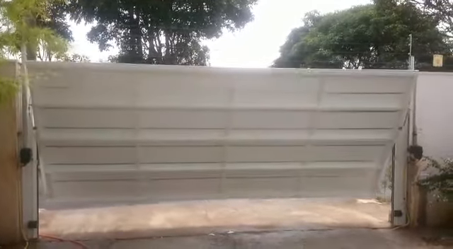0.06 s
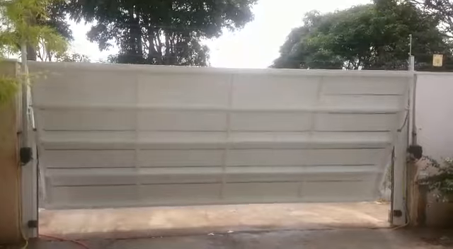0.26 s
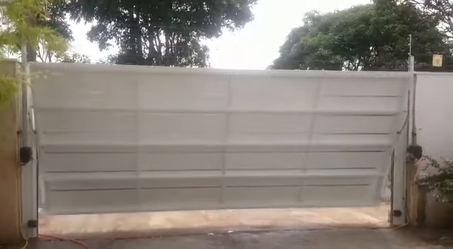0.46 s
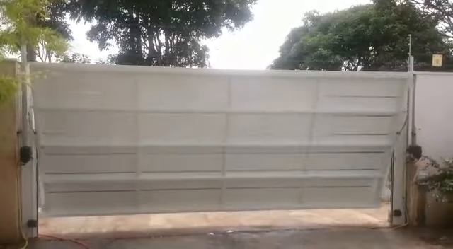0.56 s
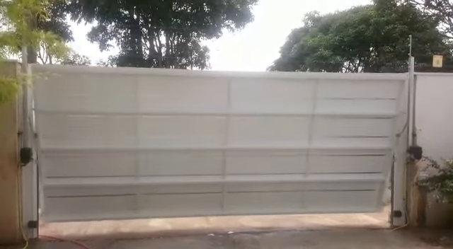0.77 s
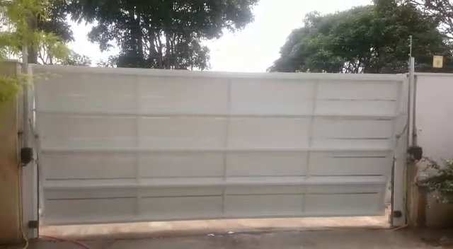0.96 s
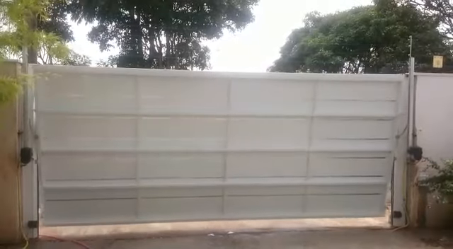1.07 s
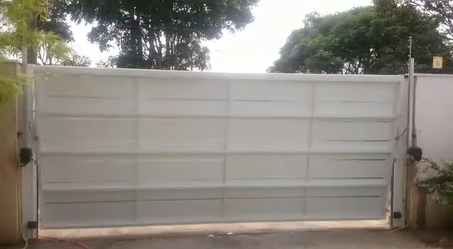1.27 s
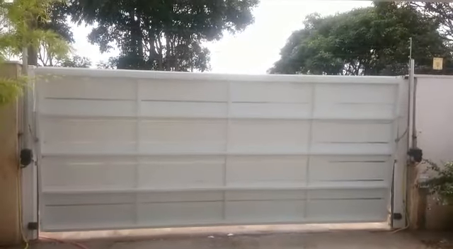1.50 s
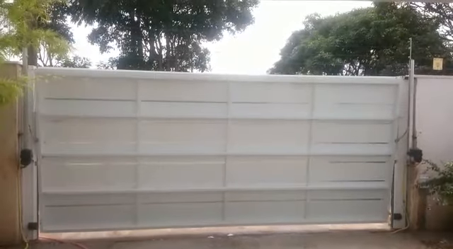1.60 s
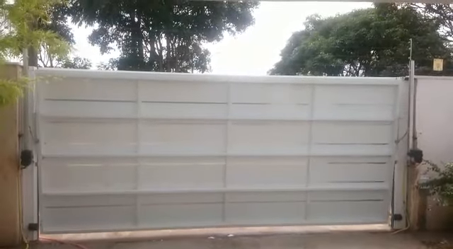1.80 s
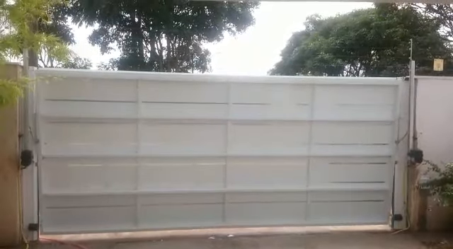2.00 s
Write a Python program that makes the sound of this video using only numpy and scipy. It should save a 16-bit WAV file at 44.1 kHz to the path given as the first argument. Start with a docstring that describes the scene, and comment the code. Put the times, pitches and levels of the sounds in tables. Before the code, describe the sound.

A metal garage gate shuts in an outdoor driveway: the drive whirs and squeaks faintly, the panel clunks and rumbles, and the motor winds down with a slowing, pulsing rasp over faint hum. The microphone is duller on the left.

```python
"""A tilting garage gate shuts

The drive whirs and rubbing metal squeals thinly, then the drive lets go with a clunk that excites the
modes of the sheet-metal panel. The motor coasts down, rubbing once a turn and ringing its housing,
over a faint mains hum. The left microphone port is muffled and hears everything slightly later."""
import sys
import numpy as np
from scipy import signal
from scipy.fft import rfft, irfft
from scipy.io import wavfile
from scipy.ndimage import map_coordinates

SR = 44100
rng = np.random.default_rng(int(sys.argv[2]) if len(sys.argv) > 2 else 0)


def digitize_waveform(pressure):
    """Quantize a signal to 16-bit integers and store it at the path in sys.argv[1].

    Rows of a 2-D input are taken as channels; values are limited to [-1, 1].
    """
    field = np.atleast_2d(pressure).T
    bounded = np.clip(field, -1, 1)
    quanta = np.round(bounded * 32767).astype(np.int16)
    wavfile.write(sys.argv[1], SR, quanta)


N = 90404
T = np.arange(N) / SR

def undb(db):
    """Decibels to amplitude ratio."""
    return 10 ** (np.asarray(db) / 20)

def unit(x):
    """Normalisation to rms 1."""
    return x / np.sqrt(np.mean(x ** 2))

def curve(rows):
    """Linear interpolation of (seconds, value) rows."""
    return np.interp(T, *np.array(rows).T)

def colour(x, points):
    """Spectral shaping by (Hz, dB) points."""
    hz, db = np.array(points).T
    freqs = np.fft.rfftfreq(2 * N, 1 / SR)
    gain = undb(np.interp(np.log(freqs + 1), np.log(hz), db))
    return irfft(rfft(x, 2 * N) * gain)[:N]

def noise(points):
    """Spectrally shaped noise of rms 1."""
    return unit(colour(rng.standard_normal(N), points))

def octave(hz):
    """Octave-band noise of rms 1."""
    sos = signal.butter(3, [hz / np.sqrt(2), hz * np.sqrt(2)], "band", fs=SR, output="sos")
    return unit(signal.sosfilt(sos, rng.standard_normal(N)))

def wander(position):
    """Smooth random modulation, one new value per unit of position."""
    return map_coordinates(rng.standard_normal(N), [position], order=3, mode="wrap")

def swell(middle, length):
    """A raised-cosine envelope, 1 at its middle."""
    return np.cos(np.pi * np.clip((T - middle) / length, -.5, .5)) ** 2

# Hum partials. Each row: frequency in Hz, level in dB.
HUM_PARTIALS = [(64.6, -70), (122, -60), (360, -66.5), (479, -72), (598, -56)]
# Easing of the hum. Each row: time in seconds, gain in dB.
HUM_GAIN = [(.9, 2), (1.3, 0)]
# Outdoor air. Each row: frequency in Hz, relative density in dB.
AIR_SPECTRUM = [(25, 23), (60, 19), (130, -5), (300, -5), (600, -10), (1200, -5), (3000, -13), (10000, -28)]
def background():
    """Superposition of a faint electric hum and the broadband noise of outdoor air."""
    hum = sum(undb(db + wander(T * 5)) * np.sin(2 * np.pi * hz * T) for hz, db in HUM_PARTIALS)
    return undb(curve(HUM_GAIN)) * hum + undb(-61.5) * noise(AIR_SPECTRUM)

# Panel rumble. Each row: frequency in Hz, relative density in dB.
RUMBLE_SPECTRUM = [(30, -32), (55, 5), (90, 1), (130, -1.5), (190, -7), (260, -8), (500, -28.5)]
# Its envelope. Each row: time in seconds, level in dB.
RUMBLE_ENVELOPE = [(0, -67), (.4, -35), (.7, -44), (1.0, -49.5), (1.35, -51), (1.5, -57.5), (2.05, -65)]
def rumble():
    """Random low-frequency vibration of the panel fades as it comes to rest."""
    return noise(RUMBLE_SPECTRUM) * undb(curve(RUMBLE_ENVELOPE))

# Low swells. Each row: middle in seconds, length in seconds, frequency in Hz, level in dB.
PANEL_SWELLS = [(.34, .11, 64, -33), (.335, .11, 158, -35), (.46, .19, 77, -34), (.51, .16, 56, -35),
                (.5, .19, 120, -36), (.755, .09, 67, -42), (.88, .1, 53, -37), (1.0, .18, 195, -46),
                (1.19, .14, 57, -47)]
def wobbles():
    """Flexural vibration: the loose panel radiates low tone bursts as it wobbles."""
    return sum(undb(db) * swell(middle, length) * np.sin(2 * np.pi * hz * (T - middle))
               for middle, length, hz, db in PANEL_SWELLS)

# Squeals. Each row: start and end in seconds, frequency in Hz, glide in Hz per second, relative dB.
SQUEAL_TONES = [(-.05, .38, 9470, 250, -13), (-.05, .26, 10340, 0, -10), (-.05, .16, 10060, 0, -7),
                (.14, .26, 10065, 0, 1), (.24, .38, 10075, 0, -4), (.37, .48, 10085, 0, 1),
                (.52, .72, 10085, 0, -1), (.08, .19, 10925, -500, -2), (.19, .33, 10870, -300, -7),
                (.295, .385, 10850, -400, 2), (.37, .55, 10810, -200, -5)]
def squeals():
    """Friction-induced oscillation: rubbing metal gives very high, rough, flickering tones."""
    out = 0
    for start, end, hz, glide, db in SQUEAL_TONES:
        pitch = hz + glide * (T - start) + 14 * wander(T * 60)
        fade = np.clip(np.minimum(T - start, end - T) / 0.033, 0, 1)
        roughness = .25 * wander(T * 400)
        angle = 2 * np.pi * np.cumsum(pitch) / SR + roughness
        flicker_db = 3 * wander(T * 35)
        out += undb(-47 + db + flicker_db) * fade * np.sin(angle)
    return out

# Housing modes. Each row: frequency in Hz, bandwidth in Hz, relative gain in dB.
HOUSING_MODES = [(1327, 65, 6), (2082, 186, -2), (2556, 270, -3.5), (2910, 65, 0), (4640, 150, -6.5),
                 (5510, 110, 2), (5870, 43, -3.5), (6000, 140, 7.5), (6350, 226, 3.5), (6200, 61, -1.5)]
def housing(x, ring=1):
    """Resonance: the motor's metal housing adds its ringing to the sound that excites it."""
    ringing = sum(undb(db) * signal.lfilter(*signal.iirpeak(hz, hz / width, fs=SR), x)
                  for hz, width, db in HOUSING_MODES)
    return x + ring * ringing

# Whir of the drive. Each row: frequency in Hz, relative density in dB.
WHIR_SPECTRUM = [(28, -35), (42, -4), (60, 7), (120, 0), (300, 1.5), (600, -3.5), (950, -4), (1330, -4),
                 (1700, -2), (2200, -6.5), (2900, -6.5), (3500, -9), (5000, -12.5), (6150, -11.5),
                 (7200, -16.5), (9000, -21.5), (12000, -23), (15500, -17)]
# Its envelope. Each row: time in seconds, level in dB.
WHIR_ENVELOPE = [(0, -37), (.17, -38.5), (.25, -35.5), (.65, -40), (1.0, -42.5), (1.35, -49.5),
                 (1.6, -54.5), (2.05, -60)]
def drive():
    """Forced vibration: gears and arms whir through the housing, fading as the gate settles."""
    return unit(housing(noise(WHIR_SPECTRUM))) * undb(curve(WHIR_ENVELOPE) + wander(T * 25))

# Late scrapes. Each row: middle in seconds, length in seconds, level in dB.
SCRAPE_SWELLS = [(1.5, .11, -46), (1.565, .045, -48), (1.678, .04, -48), (1.877, .08, -49),
                 (1.975, .08, -50)]
# Their friction noise. Each row: frequency in Hz, relative density in dB.
SCRAPE_SPECTRUM = [(1800, -39.5), (2300, -9), (2570, 2), (2900, -10), (3300, -29), (6000, -30), (9000, -45)]
def scrapes():
    """Sliding friction: in its last turns the rotor drags long enough to make the housing sing."""
    envelope = sum(undb(db) * swell(middle, length) for middle, length, db in SCRAPE_SWELLS)
    return unit(housing(noise(SCRAPE_SPECTRUM))) * envelope

# Close echoes. Each row: delay in seconds, gain in dB.
REFLECTIONS = [(.0043, -18.5), (0.0123, -12.5), (0.0221, -10), (0.0384, -21.5)]
def walls(x):
    """Early reflection: the wall and posts beside the motor return delayed copies."""
    return x + sum(undb(db) * np.pad(x, (int(delay * SR), 0))[:N] for delay, db in REFLECTIONS)

# Grinding bands. Each row: centre and width in multiples of the rotation rate, level in dB.
GRIND_BANDS = [(47.47, 7.5, -40), (79.9, 10, -44.5), (113.6, 13, -42.5), (137.8, 28, -43), (179, 36, -45),
               (255.5, 70, -46.5)]
# Their filter. Each row: frequency in Hz, gain in dB.
GRIND_FILTER = [(900, -33.5), (1700, -24), (2100, -11.5), (2650, -2.5), (3600, -4), (5000, -9), (8000, -4)]
def grinding(turns, pressure):
    """Rotational orders: rough bearing races make noise bands that sink with the speed."""
    bands = 0
    for multiple, width, db in GRIND_BANDS:
        angle = 2 * np.pi * multiple * turns
        band = wander(turns * width) * np.cos(angle) + wander(turns * width) * np.sin(angle)
        bands += undb(db) * unit(band)
    pulsing = 1 + 0.5 * (pressure - 1)  # half the grinding follows the rubs
    return housing(colour(bands * pulsing, GRIND_FILTER))

# Rubbing noise. Each row: frequency in Hz, relative density in dB.
RUB_SPECTRUM = [(900, -63), (1700, -14), (2100, -8), (2650, -5.5), (3400, -4.5), (5100, -4.5), (6150, -6),
                (7200, -5), (9200, -4.5), (10700, -3.5), (12300, -10), (15500, -5)]
# Coupling of the rub to the housing. Each row: time in seconds, gain in dB.
HOUSING_COUPLING = [(.25, 10.5), (.5, 4), (.78, 3.5), (1.05, 1), (1.3, 6.5), (1.55, 4), (1.8, 1.5),
                    (2.05, 2)]
def rubbing(pressure, slowness):
    """Amplitude modulation: friction noise follows the contact pressure and dulls at low speed."""
    grit = rng.standard_normal(N) * undb(.9 * wander(T * 3000))
    friction = colour(grit * pressure, RUB_SPECTRUM)
    rub = unit(housing(friction, ring=undb(curve(HOUSING_COUPLING))))
    fizz = signal.sosfiltfilt(signal.butter(2, 6630, "high", fs=SR, output="sos"), rub)
    return rub - fizz * slowness

# Rotor speed. Each row: time in seconds, turns per second.
ROTOR_SPEED = [(.25, 65.76), (.6, 52.85), (1.0, 38.42), (1.4, 23.91), (1.65, 14.98), (1.82, 9.18),
               (2.05, 11.0)]
# Contact left between rubs. Each row: time in seconds, share of full contact.
RESTING_CONTACT = [(.25, .32), (.75, .35), (1.05, .45), (1.35, .42), (1.7, .44)]
# Force of the rub. Each row: time in seconds, level in dB.
RUB_FORCE = [(.24, -64), (.33, -41.5), (.55, -37.5), (.75, -33.5), (1.05, -33.5), (1.35, -34), (1.6, -35),
             (1.8, -37.5), (2.05, -40.5)]
def motor(brisk_turns_per_s=31.2, rise_turns=.17, fall_turns=.13):
    """Periodic contact: the coasting rotor rubs once a turn, dragging longer in slow turns."""
    speed = curve(ROTOR_SPEED)
    turns = np.cumsum(speed) / SR
    phase = turns % 1
    slowness = np.maximum(1 - speed / brisk_turns_per_s, 0)
    drag = fall_turns * (1 + slowness)
    touch = np.where(phase < rise_turns, (phase / rise_turns) ** 2, np.exp(-(phase - rise_turns) / drag))
    touch = np.sin(np.pi / 2 * touch)  # the contact flattens at its peak
    rest = curve(RESTING_CONTACT)
    pressure = unit(rest + (1 - rest) * touch * undb(.4 * wander(turns)))
    force = undb(curve(RUB_FORCE))
    return walls(force * rubbing(pressure, slowness) + force / force.max() * grinding(turns, pressure))

# Metallic snap. Each row: frequency in Hz, relative density in dB.
SNAP_SPECTRUM = [(900, -20), (1600, 4), (2300, -2), (3000, -15), (3900, -9), (5000, -14), (6600, -7),
                 (8000, -44)]
def snap(start_s=.25, rise_s=.003, decay_s=.019):
    """An impact transient: a short, bright burst from the metal opens the clunk."""
    age = np.maximum(T - start_s, 0)
    envelope = np.minimum(age / rise_s, 1) * np.exp(-age / decay_s)
    return undb(-26.5) * envelope * noise(SNAP_SPECTRUM)

# The clunk and its rattles. Each row: start in seconds, ring gain, crack gain and knock level in dB.
IMPACTS = [(.248, 4, -2.5, -32), (0.269, -10.5, -2.5, -19.5), (.297, -10.5, -25, -18),
           (0.3089, -4.5, -2.5, -17), (0.333, -10, -3.5, -17), (0.403, -3.5, -20, -32)]
# Panel modes. Each row: frequency in Hz, relative level in dB, time to fall 60 dB in seconds.
PANEL_MODES = [(73.8, -49, 3), (118.1, -46, 1.5), (161.9, -40.5, 0.69), (198.5, -33, 0.44),
               (309, -26, 0.397), (337.5, -28, 0.43), (389.3, -29.5, 0.49), (409.2, -28, 0.37),
               (453.7, -31.5, 0.52), (484.5, -42.5, 1.16), (581, -37.5, 0.39), (630, -34.5, 0.4),
               (787, -44.5, 0.34), (1450, -43, 0.24), (1720, -41, 0.32)]
# Crack of a blow. Each row: frequency in Hz, relative density in dB.
CRACK_SPECTRUM = [(30, -40), (90, -18), (300, -18), (550, 11), (900, -27), (1900, 8), (3000, -44),
                  (6500, -14), (9000, -19.5)]
def clunk(build_s_at_100_hz=.026, crack_decay_s=.025, knock_peak_s=.00023):
    """Impulse excitation: each blow knocks, cracks briefly and rings the panel's damped modes."""
    out = 0
    for start, ring_db, crack_db, knock_db in IMPACTS:
        age = np.maximum(T - start, 0)
        for hz, mode_db, t60 in PANEL_MODES:
            build = 1 - np.exp(-age / build_s_at_100_hz * (hz / 100) ** 2)  # low modes build slowly
            out += build * undb(ring_db + mode_db - 60 * age / t60) * np.sin(2 * np.pi * hz * age)
        crack = (T >= start) * np.exp(-age / crack_decay_s) * noise(CRACK_SPECTRUM)
        knock = age / knock_peak_s * np.exp(1 - age / knock_peak_s)
        out += undb(crack_db - 30.5) * crack + undb(knock_db) * knock
    return out

# Octave bands of the sheet. Each row: centre in Hz, level in dB, build-up and 60 dB decay in seconds.
SHEET_BANDS = [(62.8, -39, 0.14, 1.4), (136, -42, 0.11, 1.9), (215, -39.5, 0.08, 1.33),
               (420, -29.5, 0.012, 0.92), (810, -36, 0.012, 0.84), (1670, -34.5, 0.0032, 1),
               (3800, -38.5, 0.0026, 0.65)]
def boom():
    """Modal overlap: the struck sheet's dense modes merge into noise; the lows build late and linger."""
    age = np.maximum(T - IMPACTS[0][0], 0)
    return sum(octave(hz) * undb(db - 60 * age / t60) * (1 - np.exp(-age / rise))
               for hz, db, rise, t60 in SHEET_BANDS)

def scene(diffuse=.4, left_lag_s=.00032):
    """Partial coherence: motor noise and some whir and ringing differ between ports; the left lags."""
    direct = squeals() + clunk() + rumble() + wobbles() + background()
    spread = boom() + drive() + snap()
    left = direct + motor() + scrapes() + np.sqrt(1 - diffuse ** 2) * spread
    left += diffuse * (boom() + drive() + snap())
    right = direct + motor() + scrapes() + spread
    lag = int(left_lag_s * SR)
    return np.array([np.pad(left, (lag, 0))[:N], right])

# Response of the left port. Each row: frequency in Hz, gain in dB.
LEFT_RESPONSE = [(60, -7.5), (200, -4), (400, -7), (700, -4.5), (1290, -12.5), (2300, -31.5), (5500, -41),
                 (9000, -16), (12000, -17), (15000, -14)]
# Its hiss. Each row: frequency in Hz, relative density in dB.
HISS_SPECTRUM = [(2000, -16.5), (6000, -17.5), (11500, -19), (13000, -10.5), (15500, -7.5)]
def record(dry):
    """Band limiting: both ports lose the deepest bass and the top; the left is muffled and hisses."""
    left = colour(dry[0], LEFT_RESPONSE) + undb(-52.5) * noise(HISS_SPECTRUM)
    low_cut = signal.butter(4, 45, "high", fs=SR, output="sos")
    high_cut = signal.ellip(10, .2, 80, 15900, fs=SR, output="sos")
    both = signal.sosfilt(low_cut, np.array([left, dry[1]]))
    return signal.sosfilt(high_cut, both)

dry = scene()
out = record(dry)
digitize_waveform(out)
```